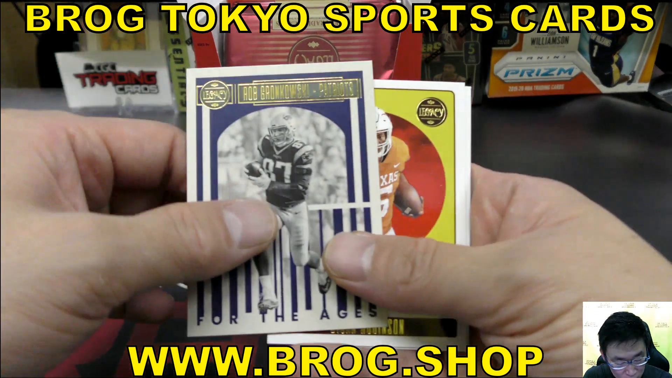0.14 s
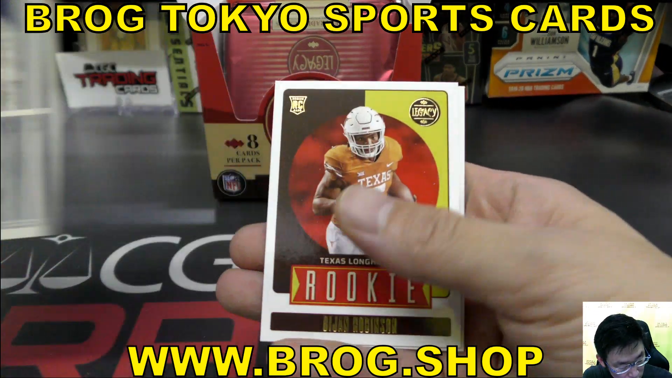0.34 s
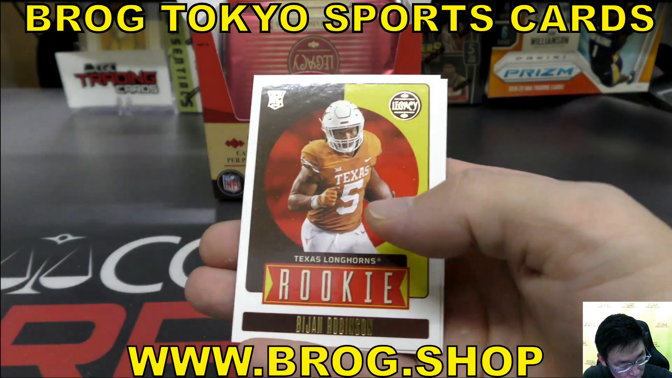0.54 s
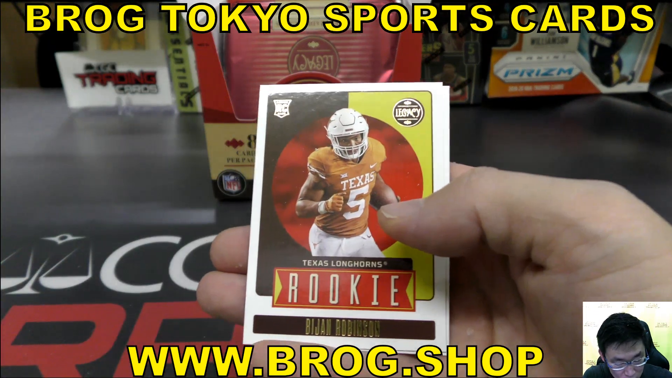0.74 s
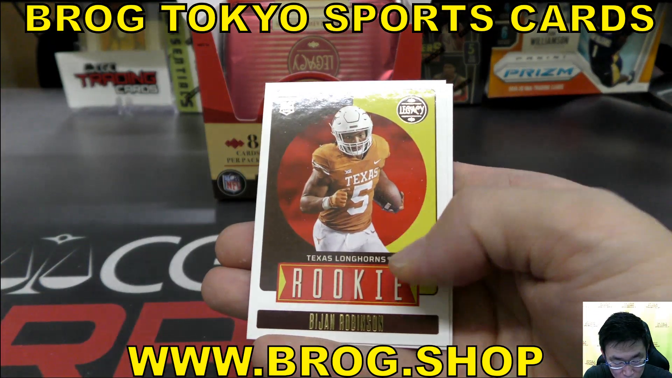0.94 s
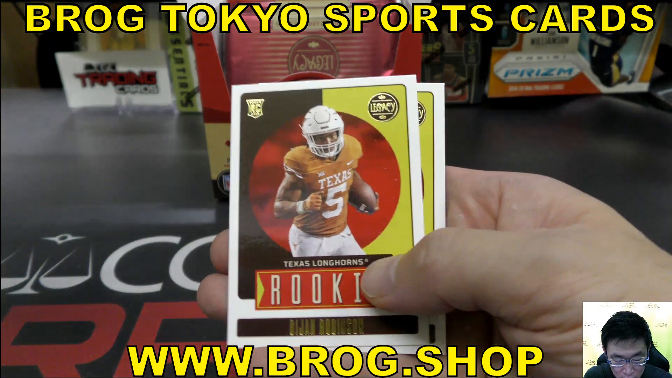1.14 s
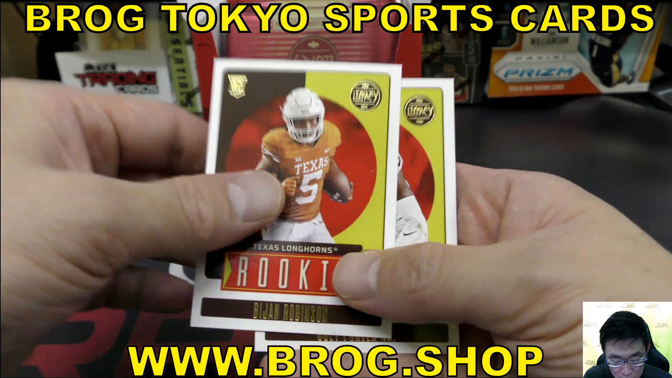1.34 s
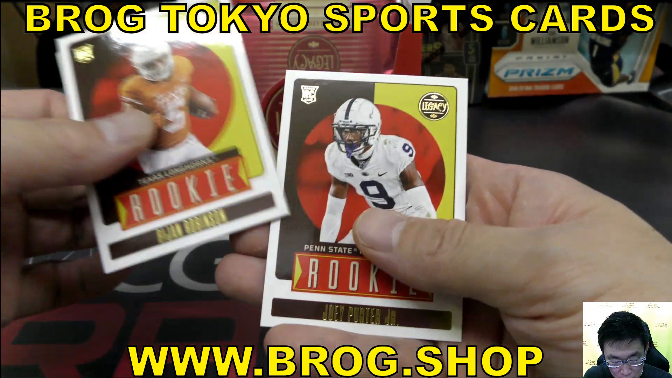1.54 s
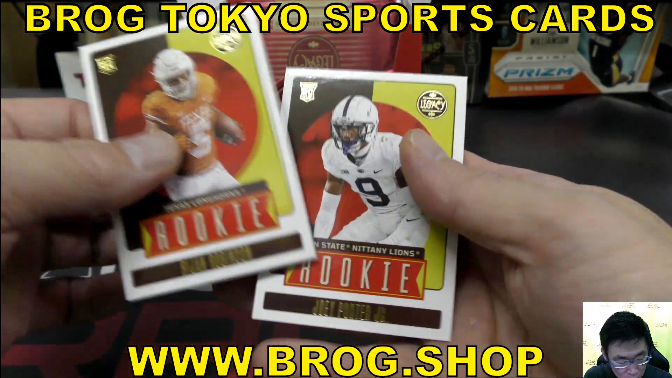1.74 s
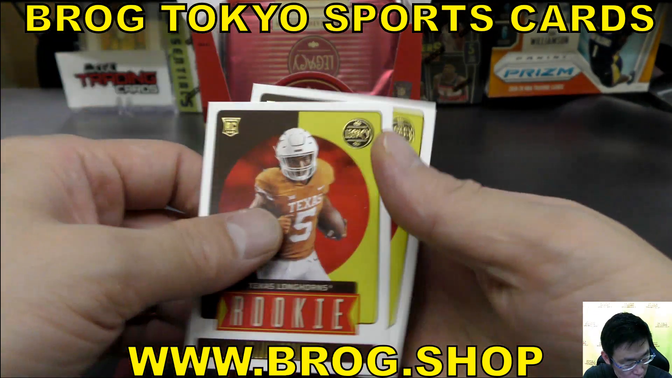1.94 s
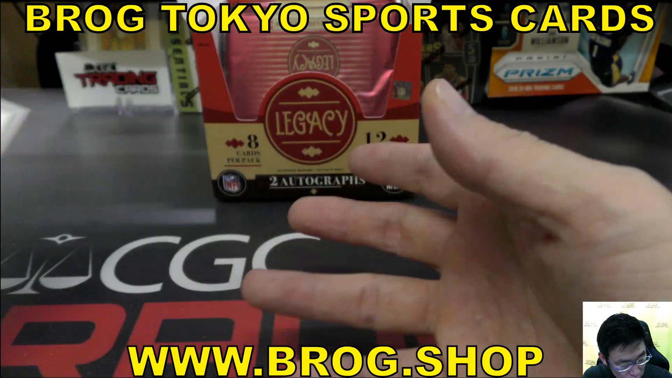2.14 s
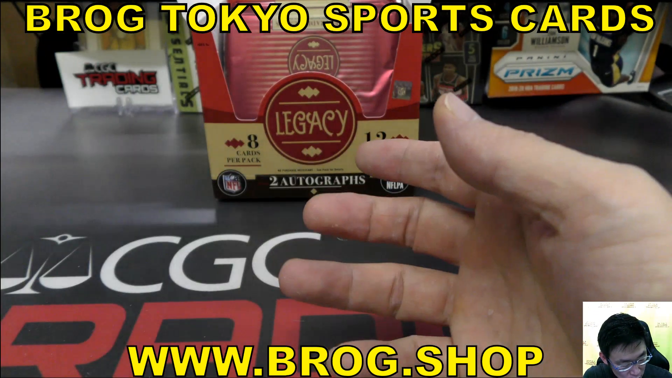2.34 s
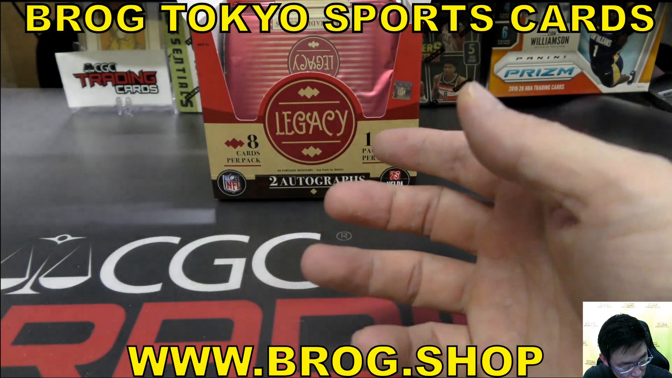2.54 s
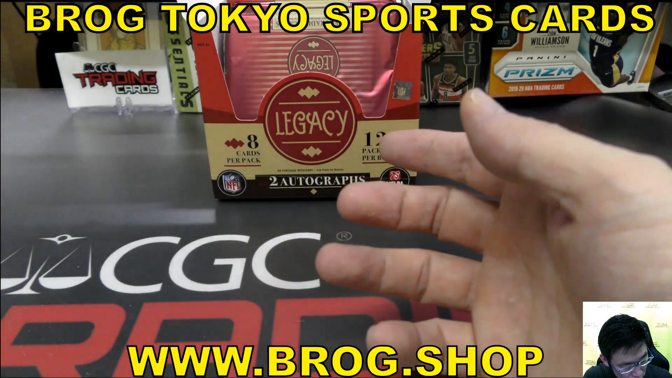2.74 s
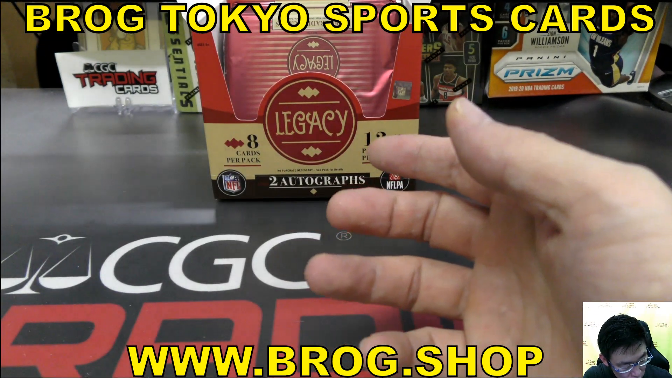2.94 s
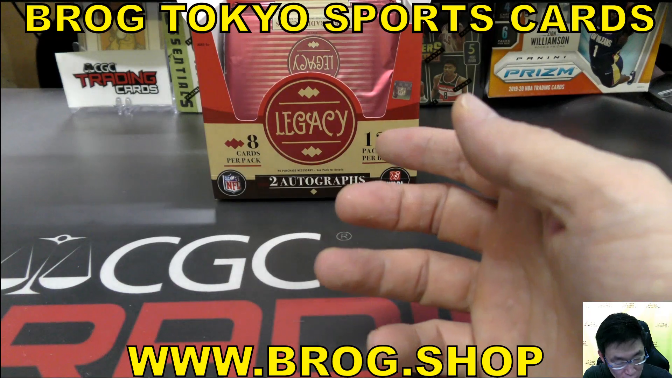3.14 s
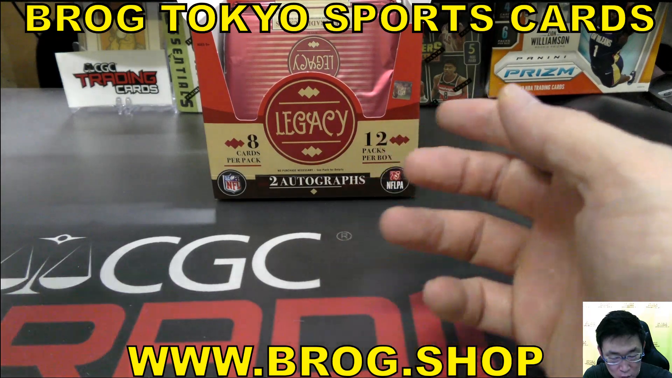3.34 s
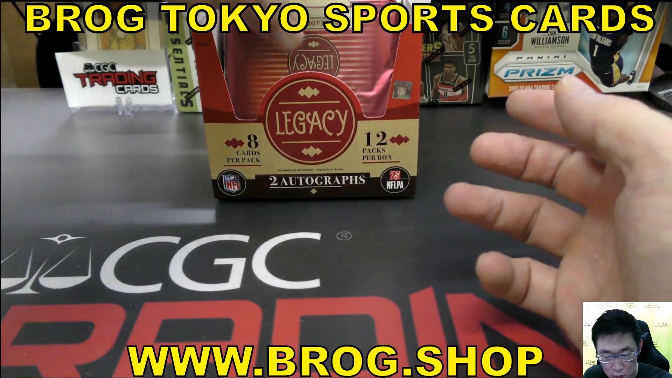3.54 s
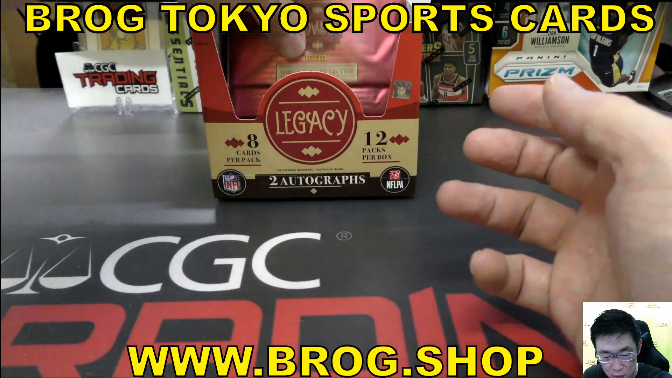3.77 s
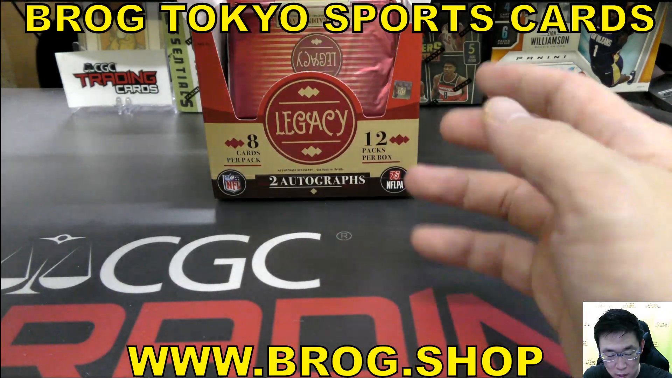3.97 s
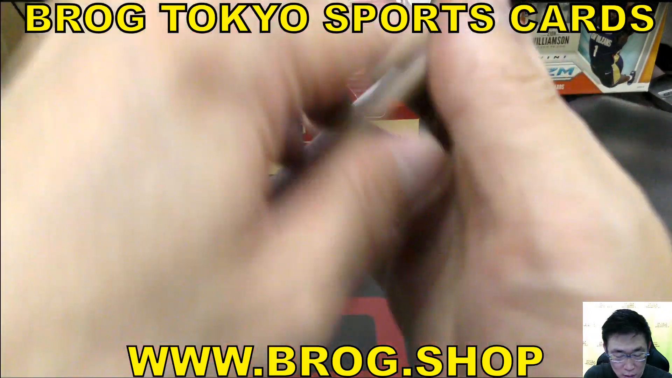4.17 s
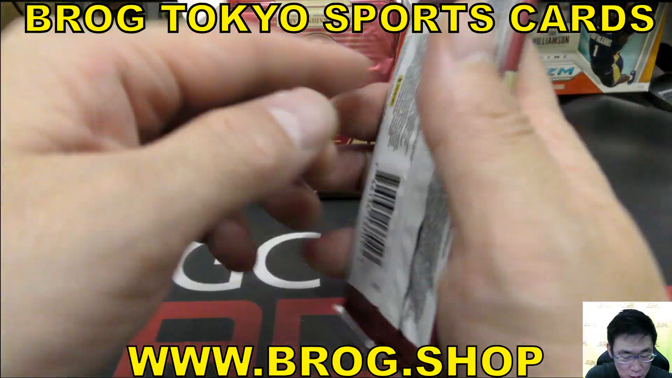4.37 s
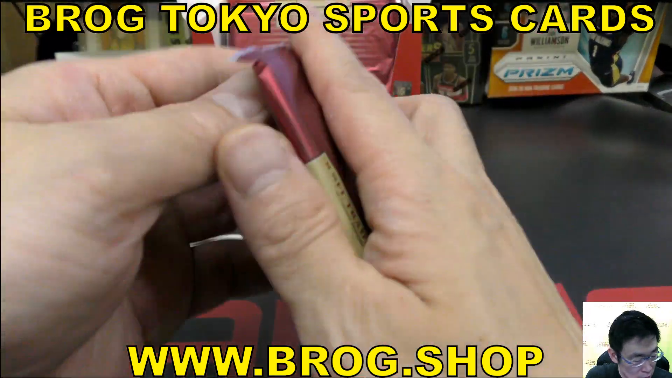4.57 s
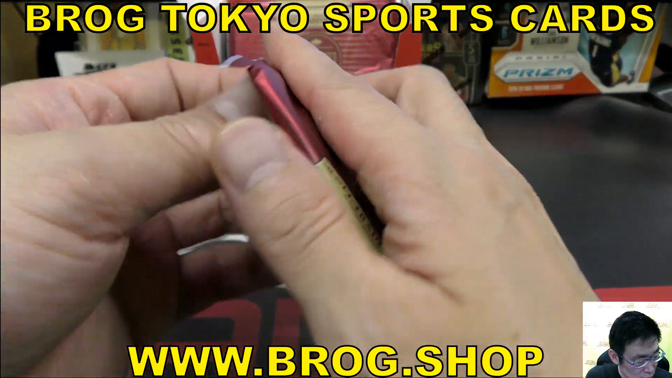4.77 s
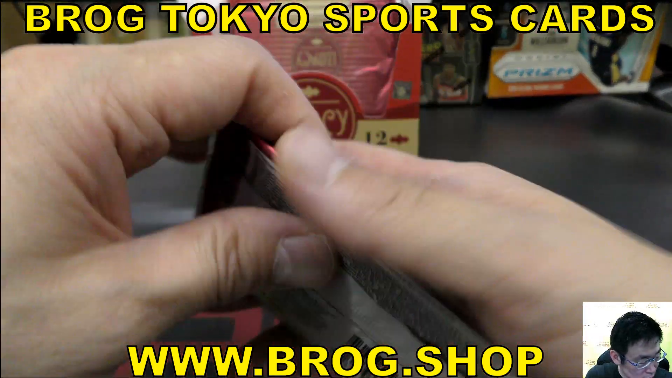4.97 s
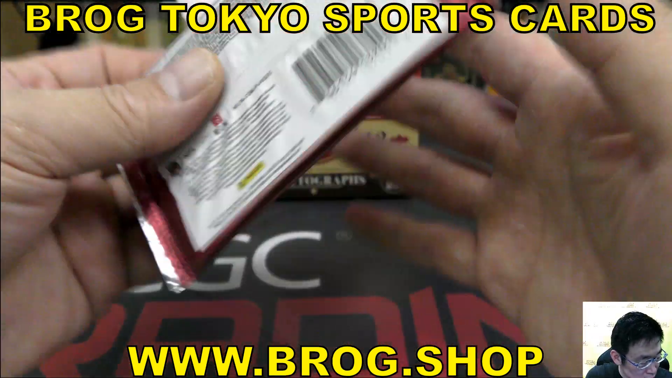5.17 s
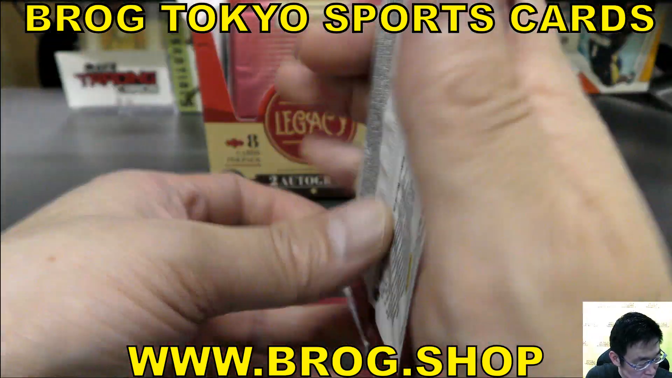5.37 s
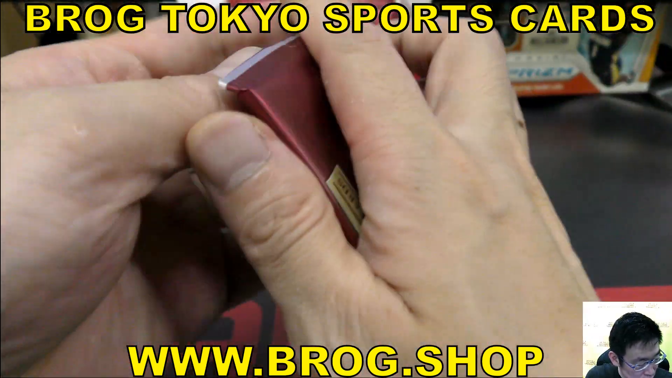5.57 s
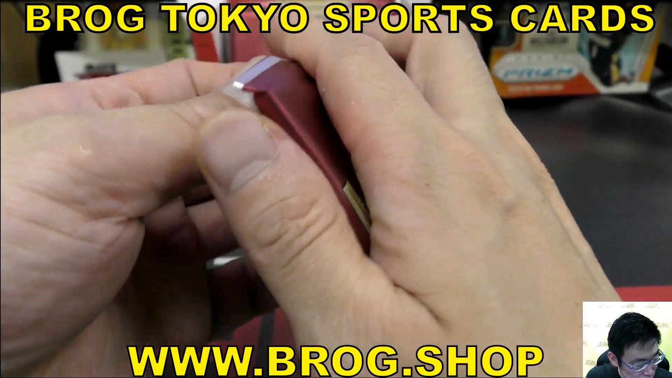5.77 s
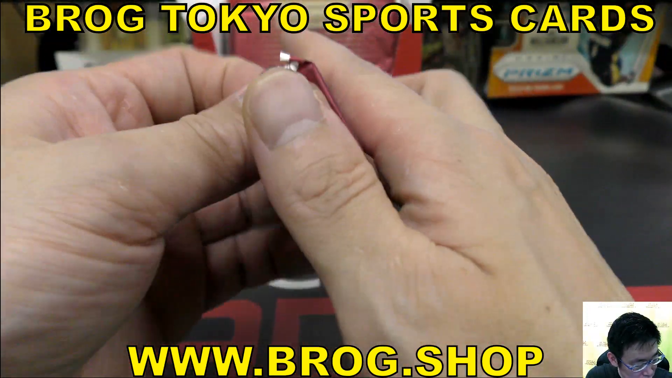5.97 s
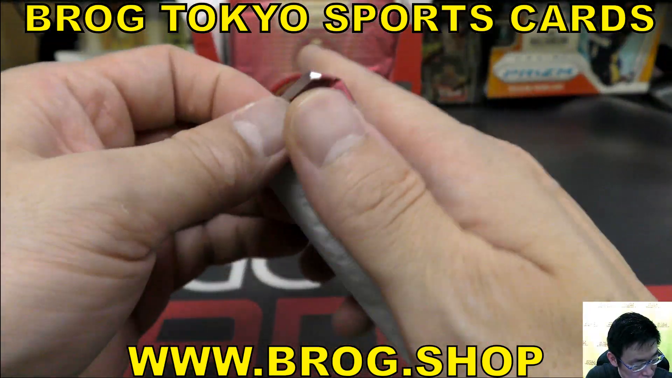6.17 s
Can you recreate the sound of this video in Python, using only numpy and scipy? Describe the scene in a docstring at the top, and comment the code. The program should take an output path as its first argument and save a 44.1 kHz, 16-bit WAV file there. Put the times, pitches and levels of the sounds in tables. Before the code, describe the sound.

Glossy cards are softly shuffled and set down, then a foil pack is pulled from a cardboard box and crinkled sharply up close.

```python
"""A foil pack crinkles in someone's hands: its creases snap and ring over a rustle of rubbing foil.
Before that, a few glossy cards are shuffled and laid down, their edges ticking and their faces hissing,
and the pack knocks a cardboard box as it is drawn out. A close microphone on the table also hears
soft bumps through the table top, the sway of moving arms, and a fan in a small quiet room."""
import sys
import numpy as np
from scipy import signal
from scipy.fft import rfft, irfft
from scipy.io import wavfile

SR = 44100
rng = np.random.default_rng(int(sys.argv[2]) if len(sys.argv) > 2 else 0)


def materialize(psi):
    """Save the field psi as 16-bit PCM at rate SR to the path in sys.argv[1].

    A 1-D psi becomes a single channel; in a 2-D psi each row is a channel.
    """
    bounded = np.clip(np.atleast_2d(psi).T, -1, 1)
    quanta = np.round(bounded * 32767).astype(np.int16)
    wavfile.write(sys.argv[1], SR, quanta)


N = 273861


def undb(db):
    """Turn decibels into a gain to multiply by."""
    return 10 ** (np.asarray(db) / 20)


def level(x, db):
    """Set a sound's average (rms) level in dB."""
    return x * undb(db) / np.sqrt(np.mean(x ** 2))


def shape(x, gain):
    """Filter a sound; gain(hz) says how much of each frequency is kept."""
    return irfft(rfft(x) * gain(np.arange(N // 2 + 1) * SR / N + 1e-3), N)


def colour(x, points):
    """Filter a sound along a curve of (Hz, dB) points."""
    hz, db = np.transpose(points)
    return shape(x, lambda f: undb(np.interp(np.log(f), np.log(hz), db)))


def band(x, lo_hz, hi_hz):
    """Keep one band of frequencies, scaled so that white noise keeps its level."""
    sos = signal.butter(3, [lo_hz, hi_hz], "band", fs=SR, output="sos")
    return signal.sosfilt(sos, x) * np.sqrt(SR / 2 / (hi_hz - lo_hz))


def noise():
    return rng.standard_normal(N)


def wander(rate_hz):
    """A slow random drift, about 1 in size."""
    return level(shape(noise(), lambda f: 1 / (1 + (f / rate_hz) ** 2)), 0)


def crackle(per_s, spread_db, t60):
    """A jumpy loudness curve of tiny snaps; each fades by 60 dB in t60 seconds."""
    hits = (rng.random(N) < per_s / SR) * undb(spread_db * rng.exponential(1, N))
    return level(signal.lfilter([1], [1, -1000 ** (-1 / (t60 * SR))], hits), 0)


def gestures(table, fall_db_s, swell_db=24):
    """Hand moves swell, hold and fade. Gives loudness curves for the main sound and its lower part."""
    t, power = np.arange(N) / SR, np.zeros((2, N))
    for full_at, swell, hold, db, lower_db in table:
        rising = swell_db * (full_at - t) / swell
        falling = fall_db_s * (t - full_at - hold)
        under_db = np.maximum(rising, falling).clip(0, 200)
        power += undb([[db], [db + lower_db]] - under_db) ** 2
    return np.sqrt(power)


# The fan's rush of air. Each row: frequency in Hz, relative level in dB.
AIR_COLOUR = [(25, -16.5), (45, -7), (75, -10.5), (125, -7.5), (300, -16), (560, -19.5), (800, -21.5),
              (1250, -27), (2000, -29.5), (2500, -33), (3500, -41), (5500, -45.5), (9000, -53),
              (16000, -59.5)]
# Room resonances fed by the fan. Each row: pitch in Hz, width in Hz, level in dB.
ROOM_HUMS = [(162.9, 7.1, -53.5), (230.1, 18, -57.5)]
# The motor's tones. Each row: pitch in Hz, drift in Hz, level in dB.
MOTOR_TONES = [(57.6, 1.06, -48), (90.3, 0.762, -48.5), (1141, 2.47, -64)]

def fan():
    """A fan blows steadily and makes the room hum, while its motor tones drift."""
    hums = sum(level(shape(noise(), lambda f: 1 / (1 + (2 * (f - hz) / width) ** 2)), db)
               for hz, width, db in ROOM_HUMS)
    swells = [undb(1.5 * wander(rate_hz=1.2)) for _ in MOTOR_TONES]
    motor = np.zeros(N)
    for swell, (hz, drift, db) in zip(swells, MOTOR_TONES):
        pitch = hz + drift * wander(rate_hz=0.696)
        motor += swell * level(np.sin(2 * np.pi * np.cumsum(pitch) / SR), db)
    return level(colour(noise(), AIR_COLOUR), db=-44) + hums + motor


# How strong the sway is. Each row: time in seconds, level in dB.
SWAY_LEVELS = [(0.0, -39.5), (0.74, -17.5), (1.21, -34), (1.71, -29), (2.02, -35), (2.07, -22.5),
               (2.47, -20.5), (2.65, -31.5), (2.85, -17), (2.92, -32.5), (3.15, -22), (3.49, -45),
               (4.12, -17.5), (4.17, -29), (5.17, -16.5), (5.64, -26), (5.78, -19.5), (6.21, -22)]
# The sway's deep rumble. Each row: frequency in Hz, relative level in dB.
SWAY_COLOUR = [(2, -51), (6, -5), (13, 11), (20, -2.5), (27, -7), (45, -16.5), (62, -20.5), (85, -41),
               (130, -85)]

def arm_sway():
    """Moving arms rock the table and microphone, mostly too slowly to have a pitch."""
    times, db = np.transpose(SWAY_LEVELS)
    rumble = level(colour(noise(), SWAY_COLOUR), 0)
    return rumble * undb(np.interp(np.arange(N) / SR, times, db))


# Hands and cards bump the table. Each row: start in seconds, peak in dB, pitch in Hz, rise in seconds.
TABLE_BUMPS = [(0.057, -29, 114, 0.013), (0.284, -30, 164, 0.015), (0.804, -33.5, 149, 0.013),
               (0.888, -36.5, 166, 0.016), (2.043, -21.5, 165, 0.015), (2.45, -18.5, 151, 0.011),
               (2.814, -12.5, 126.5, 0.016), (3.016, -36, 133.4, 0.016), (4.122, -32.5, 136, 0.023),
               (4.202, -28, 129, 0.0079), (4.37, -32, 102, 0.014), (5.131, -27.5, 140, 0.0064),
               (5.263, -18, 148, 0.0079), (5.711, -36, 104, 0.016)]

def table_bumps():
    """A soft push makes the table top swell and fade at its own low pitch."""
    out, t = np.zeros(N + 12000), np.arange(12000) / SR
    for start, peak_db, hz, rise in TABLE_BUMPS:
        swell = (t / rise * np.exp(1 - t / rise)) ** 2
        out[int(start * SR):][:len(t)] += undb(peak_db) * swell * np.sin(2 * np.pi * hz * t)
    return out[:N]


# The box's own tones. Each row: pitch in Hz, relative level in dB, seconds to fade by 60 dB.
BOX_TONES = [(689, 1.5, 0.034), (1205, -2.5, 0.027), (2040, -4.5, 0.04), (2890, -4, 0.043)]
# Knocks on the box. Each row: start in seconds, level in dB.
BOX_KNOCKS = [(3.7495, -25.5), (3.8, -26), (3.806, -23)]

def box_knocks():
    """The pack knocks the hollow cardboard box on its way out, and the box rings briefly."""
    out, t = np.zeros(N), np.arange(4000) / SR
    attack = np.minimum(t / 0.00044, 1)
    for start, knock_db in BOX_KNOCKS:
        ring = sum(undb(db) * 1000 ** (-t / t60) * np.sin(2 * np.pi * (hz * t + rng.random()))
                   for hz, db, t60 in BOX_TONES)
        out[int(start * SR):][:len(t)] += undb(knock_db) * attack * ring
    return out


# The microphone's peaks and dips. Each row: frequency in Hz, boost or cut in dB.
MIC_COLOUR = [(400, 1.5), (700, -7.5), (870, 0), (1300, -3), (1900, 0.5), (2900, -5), (3600, 0.5),
              (4600, -0.5), (5700, 1.5), (6500, -0.5), (8600, 0), (11000, -1.5), (13500, -2.5), (16000, 5)]

def close_mic(x):
    """The microphone colours the cards and foil handled right in front of it."""
    return colour(x, MIC_COLOUR)


# Three bands, low to high: body, middle, sizzle. Each row: low edge in Hz, high edge in Hz.
BANDS = [(450, 2780), (3200, 8030), (7500, 14100)]

def snaps(table, t60, ring_db, ring_t60):
    """Each snap is a sudden burst of noise in three bands, plus the ring of the panel that buckled."""
    t = np.arange(2000) / SR
    loudness, ring = np.zeros((3, N + len(t))), np.zeros(N + len(t))
    fades = t60 * np.array([1.6, 1, .8])  # the body lasts longest
    bursts = [(1 - np.exp(-t / (0.051 * fade))) * 1000 ** (-t / fade) for fade in fades]
    ring_shape = np.minimum(t / 0.00077, 1) * 1000 ** (-t / ring_t60)
    for start, middle_db, body_db, sizzle_db, hz in table:
        span = slice(int(start * SR), int(start * SR) + len(t))
        band_db = middle_db + np.array([body_db, 0, sizzle_db])
        loudness[:, span] += undb(band_db)[:, None] * bursts
        ring_gain = undb(ring_db + band_db[np.searchsorted([3000, 7500], hz)])  # follows its own band
        ring[span] += ring_gain * ring_shape * np.sin(2 * np.pi * (hz * t + rng.random()))
    return sum(band(gain[:N] * noise(), *edges) for gain, edges in zip(loudness, BANDS)) + ring[:N]


# Card edges ticking. Each row: start in seconds, middle band level in dB,
# body and sizzle in dB compared with the middle, ring pitch in Hz.
CARD_TICKS = [(0.084, -50, -10, -13, 3700), (0.2069, -48, 1, -10, 4610), (0.382, -49.5, 4, -13, 3120),
              (0.4114, -60, 2, 14, 3400), (0.7505, -47.5, 10, -1, 3830), (0.8016, -53, 12, -15, 3150),
              (0.866, -42.5, -2, 0.5, 3550), (0.9582, -51, 2, -19, 3380), (1.3026, -45.5, 8, -14, 3480),
              (1.3342, -39.5, 3, -22, 3600), (1.4704, -43, -4, -21, 3530), (1.7409, -43.5, 6, -23, 3300),
              (1.7514, -53, -5, -23, 3050), (1.7794, -44.5, 6, -12, 3450), (1.8545, -45.5, 4, -18, 4870),
              (2.3436, -50.5, 7, -15, 3640), (2.4113, -39.5, 8, -26, 3300), (2.4402, -38.5, 6, 9, 3850),
              (2.7911, -50.5, 10, -20, 5040)]
# Cards sliding. Each row: time of full level, swell and hold (all in seconds), hiss level in dB,
# scrape in dB compared with the hiss.
CARD_SLIDES = [(.03, 0.11, .04, -67.5, -14), (.146, 0.052, .01, -48.5, -17), (.29, 0.09, .005, -65, -3),
               (.35, 0.014, .002, -56.5, -21), (.42, .1, .07, -68, -14), (.748, .008, 0.034, -65.5, -6),
               (.864, .006, .005, -65, -6), (1.08, .08, .12, -75.5, 10.5), (1.21, .1, .04, -62, -1),
               (1.302, .007, 0.047, -67, 10), (1.432, 0.19, 0.005, -51.5, -5), (1.74, .01, .06, -64, -9),
               (1.844, 0.018, 0.058, -63, -2), (1.988, .07, .04, -65.5, -12),
               (2.44, 0.076, 0.0095, -52, -5), (2.795, .015, .09, -66.5, -2)]

def cards():
    """Edges tick; glossy faces hiss as they slide, with a lower scrape under the thumb."""
    hiss_gain, scrape_gain = gestures(CARD_SLIDES, fall_db_s=285)
    grain = .8 + 0.33 * crackle(per_s=450, spread_db=3.3, t60=.006)
    scrape = band(noise(), 3180, 3770) + undb(-11) * band(noise(), 4100, 6000)
    slide = hiss_gain * band(noise(), 3100, 14000) + scrape_gain * scrape
    ticks = snaps(CARD_TICKS, t60=0.019, ring_db=2.8, ring_t60=0.013)
    return close_mic(ticks) + grain * slide


def small_creases(firmness, per_s=30):
    """Rows for snaps(): little creases give way at random, louder when the squeeze is firmer."""
    count = int(per_s * N / SR)
    at = rng.random(count) * N
    size = rng.exponential(1, count).clip(0, 2.5)
    pitch, body_scatter, sizzle_scatter = rng.standard_normal((count, 3)).T
    middle_db = 20 * np.log10(firmness[at.astype(int)] + 1e-9) + 6.5 + 4 * size
    body_db = -8 - 3.5 * pitch + 4 * body_scatter  # low rings have more body
    sizzle_db = -3.5 + 2.5 * pitch + 3 * sizzle_scatter  # high rings have more sizzle
    hz = (5110 * 2 ** (0.48 * pitch)).clip(600, 14000)
    return list(zip(at / SR, middle_db, body_db, sizzle_db, hz))


# Foil creases snapping. Each row: start in seconds, middle band level in dB,
# body and sizzle in dB compared with the middle, ring pitch in Hz.
FOIL_SNAPS = [(3.6906, -35, -1, 11, 1970), (3.7302, -34, 8, -2, 2190), (3.7389, -30, -2, -7, 4400),
              (3.7487, -19.5, 3.5, 6.5, 2020), (3.7562, -23.5, -9, 0, 5570), (3.7643, -30, -6.3, 0, 5440),
              (3.804, -30.5, 12, 3, 800), (3.8677, -32, -8, -9, 5900), (3.8957, -31, 4.5, 2, 1320),
              (4.1146, -18, -3.5, 0.7, 8860), (4.1192, -22.5, -9, -2, 7160), (4.1397, -20, -17, 5, 7300),
              (4.1542, -18, -6, -7, 7360), (4.176, -21.5, -3.5, 5.5, 5570), (4.2285, -22, -23, -1.5, 12600),
              (4.2485, -31, -7, 2, 4700), (4.3134, -28.5, -3, 4, 8720), (4.4746, -27, -4, 6, 9300),
              (4.4784, -12.5, -10, 0, 8600), (4.4886, -26, -13.5, -10, 8000),
              (4.5102, -24.5, -0.5, -4, 1660), (4.5289, -28, -3, -4.6, 6720),
              (4.5613, -21, -8.5, -11, 3320), (4.5773, -29.5, -1.5, -14, 3270), (4.611, -25, -8, -3, 5500),
              (4.6418, -18.5, -22, 8, 8870), (4.6515, -30.5, 0, 1, 5540), (4.6825, -14.5, -12, 0.5, 5300),
              (4.6929, -33, 0, 6, 8100), (4.7393, -18.5, -6, 4, 6470), (4.7742, -31, -19, 1, 4050),
              (4.7874, -29, -14.9, 3, 7200), (4.8177, -31, -13, 3, 5560), (4.843, -25.5, -7, 5, 6900),
              (4.905, -25.5, -9, 1, 5150), (4.943, -35, 0, 5, 960), (4.9516, -15, -14.5, 2, 5720),
              (4.9895, -33, -3, -3.2, 4170), (5.0232, -27, -20, 4, 4040), (5.0639, -34, -1, -5.7, 5650),
              (5.075, -20.5, -7.5, -0.5, 7300), (5.1345, -14.5, -14, -0.5, 7030),
              (5.169, -29, -10, -17, 4180), (5.2064, -19, -6.5, -2, 3720), (5.2651, -11.5, -19, -0.5, 8720),
              (5.2841, -14, -17, -2, 5680), (5.2905, -37, 4, -4, 870), (5.2964, -16, -17, -11.6, 4550),
              (5.3193, -22.5, 2.5, 5, 2200), (5.3264, -35, 6, -11, 2180), (5.3521, -30, -2, -6, 5430),
              (5.3844, -31.5, -5, -10, 5850), (5.4024, -28, -16, 1, 7300), (5.4206, -35, -14, -3.3, 7130),
              (5.5123, -30.5, 0, -11.5, 4570), (5.518, -17.5, -14, 3.5, 7400),
              (5.5455, -14, -35, -0.5, 4500), (5.5723, -19, -29, -5, 5670), (5.5898, -24.5, -14, 0, 5600),
              (5.613, -32, -9.6, 13.5, 12900), (5.639, -25.5, -4.5, -12, 4340),
              (5.6878, -15.5, -14.5, -2, 5430), (5.7098, -19, -7, 2, 7270), (5.7352, -17.5, -15, 5, 7300),
              (5.7492, -29.5, -12, -11, 5600), (5.7598, -20, -16, 5, 8800), (5.7682, -13, -21, 4, 6850),
              (5.7779, -27, -23, 14, 4200), (5.7835, -16, 3, -12, 3570), (5.7894, -25, 6, -10, 4000),
              (5.7983, -12, -8.5, -3, 3700), (5.8035, -29, 9, 0, 920), (5.8125, -23, -12, -6, 3770),
              (5.8227, -26, -12, -5, 3620), (5.8306, -14.5, -29, -2, 3730), (5.8485, -23, 0.5, 6, 3550),
              (5.9355, -20.5, -8, 4, 8970), (5.9477, -20.5, -9, 2, 3710), (5.9639, -29, -3, -2, 4340),
              (5.981, -32, 2, -7, 875), (5.9995, -21.5, -4.5, -10, 850), (6.0045, -21, -8, -1, 7000),
              (6.0227, -13.5, -29, 4.5, 4100), (6.027, -35, 7, -4, 870), (6.0334, -21.5, -18, -9, 4160),
              (6.0702, -38, -9, -11, 4300), (6.0842, -31, -14, -1, 8260), (6.1025, -18, -23, -9, 5800),
              (6.114, -13.5, -9, -3, 8570), (6.152, -19, -6, -3, 5800), (6.1592, -34, -17, -7, 5600),
              (6.171, -10, -4, -1, 8450), (6.1864, -14, 1.5, -4, 1760), (6.1938, -12, -19, 4.5, 4330)]
# The foil is pulled, squeezed and shifted. Each row: time of full level, swell and hold (all in
# seconds), rustle level in dB, body in dB compared with the rustle.
FOIL_SQUEEZES = [(3.613, 0.0069, 0.12, -49, 2.5), (3.765, 0.088, 0.012, -33, -3.5),
                 (3.866, 0.036, 0.027, -42, -4), (3.96, .05, 0.125, -63.5, -9),
                 (4.116, 0.014, 0.034, -38.5, -5), (4.19, 0.073, 0.068, -46.5, -5),
                 (4.315, .03, 0.011, -49, 1), (4.37, .05, 0.096, -60.5, -6),
                 (4.48, 0.014, 0.014, -36.5, -4.5), (4.56, 0.092, .14, -48, -6),
                 (4.78, 0.23, 0.048, -42.5, -3.5), (4.95, .1, 0.082, -40, -5), (5.14, .02, 0.022, -48.5, 2),
                 (5.28, 0.078, 0.062, -38.5, -1), (5.4, 0.078, 0.039, -49.5, -6),
                 (5.56, 0.15, 0.079, -40.5, -5.5), (5.76, 0.097, 0.072, -33, -3),
                 (5.9, 0.046, .03, -62.5, 0), (5.95, 0.047, 0.13, -43, -0.5), (6.2, 0.095, .02, -29, -2.5)]
# The pack's hollow ringing. Each row: pitch in Hz, width in Hz, level in dB compared with the body.
PACK_HOLLOW = [(858, 157, -8), (2156, 360, -9)]

def foil_pack():
    """Squeezed foil buckles in loud snaps over a rustle of rubbing, and the pack's hollow rings."""
    firmness, body_gain = gestures(FOIL_SQUEEZES, fall_db_s=320)
    grain = .5 + .5 * crackle(per_s=310, spread_db=4.66, t60=0.027)
    rustle = sum(band(gain * grain * noise(), *edges)
                 for gain, edges in zip((body_gain, firmness, firmness), BANDS))
    hollow = sum(undb(db) * band(body_gain * grain * noise(), hz - width / 2, hz + width / 2)
                 for hz, width, db in PACK_HOLLOW)
    creases = snaps(FOIL_SNAPS + small_creases(firmness), t60=0.011, ring_db=-0.99, ring_t60=0.014)
    return close_mic(creases + rustle + hollow)


def scene(room_t60=.1, room_db=-16):
    """Foil, cards and box echo briefly in the small room; bumps, sway and fan lie underneath."""
    near = foil_pack() + cards() + box_knocks()
    t = np.arange(SR // 3) / SR
    tail = rng.standard_normal(len(t)) * 1000 ** (-t / room_t60) * (t > .002)
    echo = signal.fftconvolve(near, tail / np.sqrt(np.sum(tail ** 2)))[:N]
    return (near + undb(room_db) * echo + table_bumps() + arm_sway() + fan())[None]


def record(dry, step_hz=15900, cutoff_hz=16800):
    """The very highest treble drops in a step, then is cut off."""
    stepped = shape(dry[0], lambda f: np.where(f > step_hz, undb(-22), 1))
    low_pass = signal.ellip(10, .2, 80, cutoff_hz, fs=SR, output="sos")
    return signal.sosfilt(low_pass, stepped)[None]


dry = scene()
out = record(dry)
materialize(out)
```